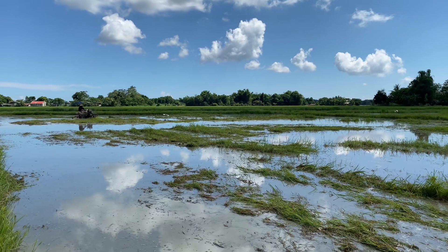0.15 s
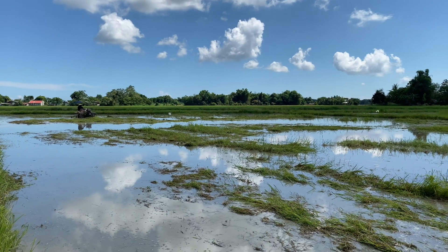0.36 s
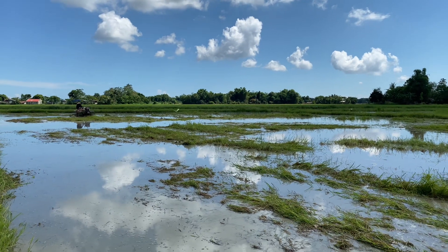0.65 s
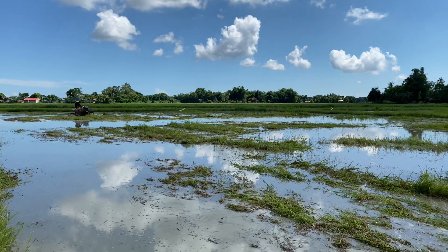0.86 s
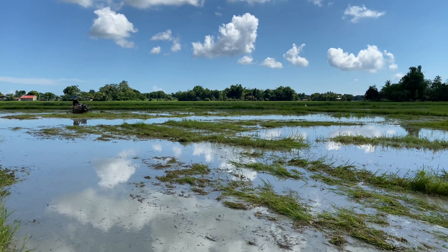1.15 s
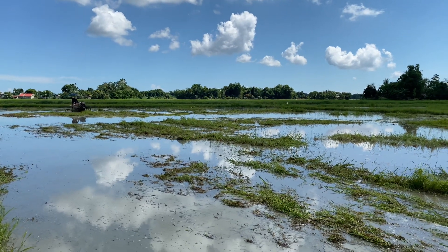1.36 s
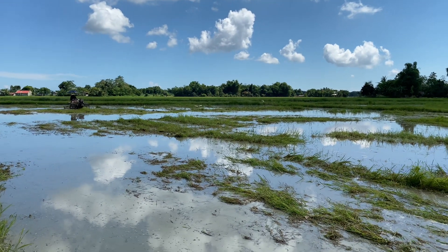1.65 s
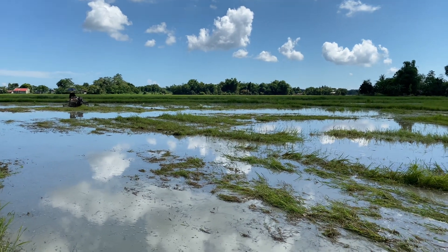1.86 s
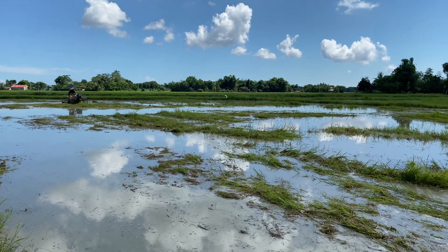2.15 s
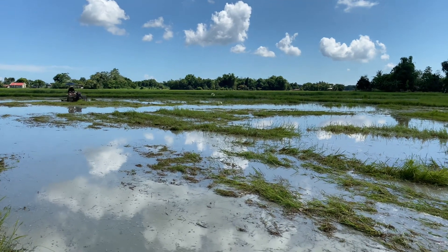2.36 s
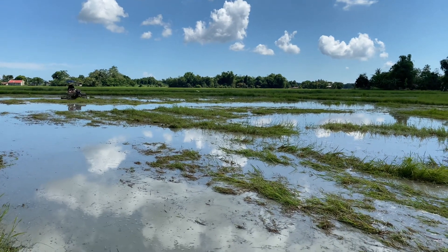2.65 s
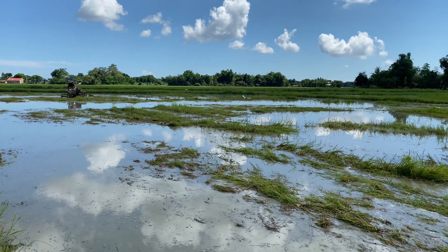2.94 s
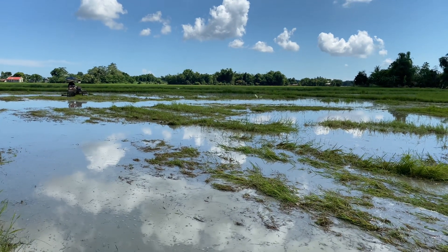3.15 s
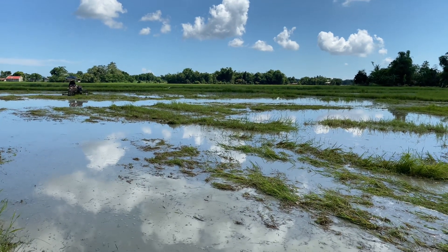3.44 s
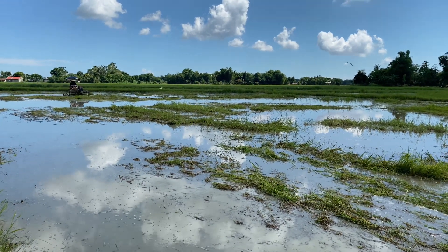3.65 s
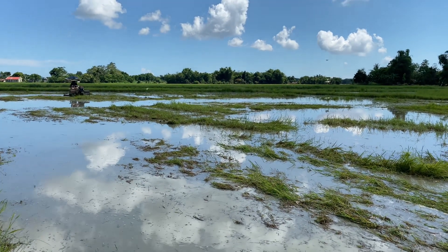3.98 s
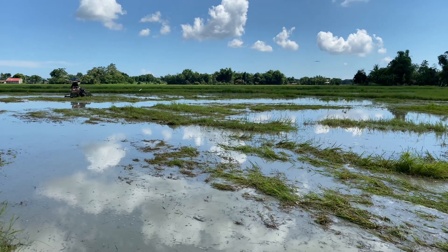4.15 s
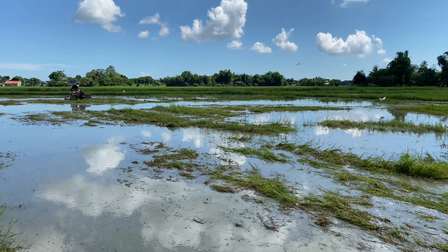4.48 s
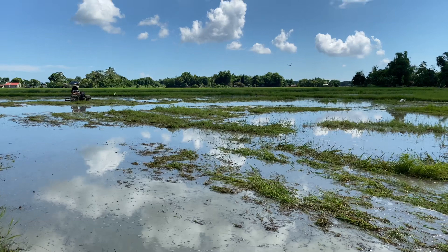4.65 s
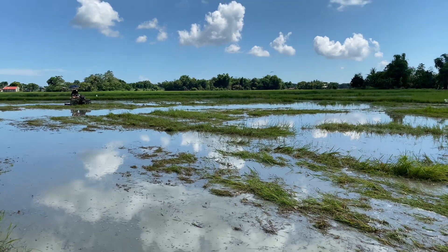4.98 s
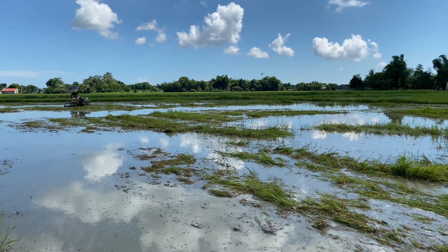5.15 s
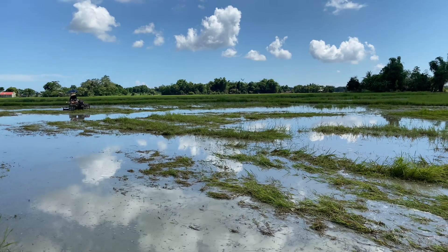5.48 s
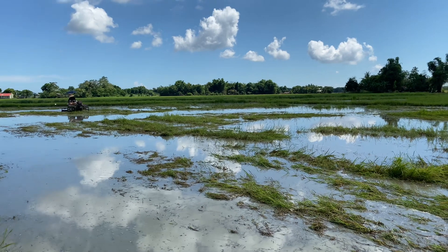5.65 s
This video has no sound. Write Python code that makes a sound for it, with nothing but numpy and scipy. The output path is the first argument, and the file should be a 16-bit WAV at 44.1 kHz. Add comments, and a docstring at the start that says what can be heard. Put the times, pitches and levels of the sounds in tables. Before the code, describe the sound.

A hand tractor's single-cylinder engine runs some way off in a flooded field, with fast, even exhaust thumps and light metallic clatter. It swells at the start, dips briefly past the middle and again near the end, then comes back. A thin high hiss of air and insects continues behind it. A few soft hollow knocks and light puffs of wind sound close to the stereo microphone.

```python
"""Hand tractor in a flooded field

A one-cylinder engine works some way off, firing about 16 times a second. Each firing thumps through
the muffler, barks from the tailpipe and knocks the engine block; in between, pipes ring, valves
clatter and the engine hums. The exhaust swells at the start and sinks briefly twice. Air and insects
hiss over the field, while a few soft knocks and puffs of air sound near the microphones."""
import sys
import numpy as np
from scipy import signal
from scipy.fft import rfft, irfft, next_fast_len
from scipy.io import wavfile
from scipy.ndimage import map_coordinates

SR = 44100
rng = np.random.default_rng(int(sys.argv[2]) if len(sys.argv) > 2 else 0)


def bounce(signal):
    """Save signal as a 16-bit WAV file at the path given by the first command-line argument."""
    frames = np.transpose(np.atleast_2d(signal))
    limited = np.clip(frames, -1, 1)
    pcm = np.round(limited * 32767).astype(np.int16)
    wavfile.write(sys.argv[1], SR, pcm)


N = 256662

# tone given by the ground's echo where the tractor starts and where it ends up: f/Hz, gain/dB
GROUND_START = [(300, 0), (500, -1), (680, 2), (800, 0.5), (1150, -2.5), (1350, 1), (1650, -2.5), (1950, 1),
                (2600, -0.5), (3800, -2), (5000, 0.5), (7000, 0)]
GROUND_END = [(350, 0), (540, -4.5), (680, -1), (800, -0.5), (1020, 4), (1250, 0), (1500, 0), (1900, 0.5),
              (2700, -1), (4200, 0), (5000, 0.5), (7000, -0.5)]
# how much of each tone is heard: t/s, start share/0-1, end share/0-1
GROUND_SHARES = [(0, 1, 0), (2.2, 0, 0), (4.6, 0, .1), (5.3, 0, 1)]
# sound thrown back by banks and trees: f/Hz, gain/dB
ECHO_TONE = [(60, -18), (150, -24), (300, -12), (550, -9), (850, -13), (1150, -11), (2000, -9), (3500, -7),
             (5000, -10), (6500, -17), (9000, -7), (15000, -6)]
# how far the left microphone is ahead of the right: f/Hz, phase/rad
LEFT_LEAD = [(250, -.28), (500, .5), (800, .8), (1300, 1.1), (1500, 1.7), (1720, 3.1), (2000, 6),
             (2400, 8.4), (2850, 7.9), (3500, 8.7), (4200, 11.9), (6000, 12.6), (7500, 12.6), (8300, 9.4),
             (10000, 6.3), (12000, 3.1), (13800, 0), (15800, -2)]
# how much louder the left one is: f/Hz, gain/dB
LEFT_GAIN = [(90, 0), (140, 1), (220, 1.5), (350, -1.3), (550, -2.7), (850, -2.7), (1130, 5), (1550, 0),
             (1900, 3.5), (2700, 5), (3400, 7), (4600, 3), (6000, 0), (15000, 0)]

# puffs of air on the microphones: t/s, level/dB, half length/s
AIR_PUFFS = [(0.872, -33, 0.043), (1.424, -30, 0.2), (1.904, -32, 0.19), (2.675, -30, 0.041),
             (3.05, -32, 0.13), (3.578, -31.5, 0.046), (4.5, -30.5, 0.046), (4.898, -44.5, 0.14),
             (5.284, -33, 0.025), (5.7, -31, 0.095)]
# their rumble: f/Hz, level/dB
AIR_TONE = [(15, -34), (35, -15), (48, -9), (62, 13), (85, 9.5), (140, -30), (300, -51)]
# hiss of field and machine: f/Hz, level/dB
HISS_TONE = [(1500, -30), (3500, -1), (4900, 10), (5700, 7.5), (6500, 10.5), (7600, 4), (9000, 3.5),
             (10900, 4.5), (12200, -7), (13500, -7), (15500, -13)]
# the field's upper part and the machine's lower part of that hiss: t/s, level/dB
FIELD_HISS_LEVEL = [(0, -49.5), (.95, -45.5), (1.35, -50), (2, -46), (3.2, -46.2), (3.65, -48.8),
                    (4, -45.5), (5, -44.5), (5.82, -47)]
MACHINE_HISS_LEVEL = [(0, -53.5), (1.5, -51), (3.2, -44.5), (3.75, -48.5), (5.82, -48.5)]
# soft knocks nearby: t/s, level/dB, f/Hz, time to fade by 60 dB/s, click level/dB
SOFT_KNOCKS = [(.16, -29.5, 559, 0.053, -63), (2.493, -17.5, 596, 0.023, -13.7),
               (2.857, -21.5, 535, 0.055, -29), (2.859, -23.5, 323, 0.089, -42),
               (2.866, -15, 140, 0.059, -63), (3.508, -26.5, 267, 0.085, -55), (4.087, -29, 576, 0.13, -48),
               (4.102, -27, 472, 0.12, -51), (4.578, -21.5, 640, 0.023, -42), (4.657, -17, 580, 0.029, -42),
               (4.683, -25.5, 718, 0.058, -48), (4.72, -30, 600, 0.047, -52)]
# the notes in their dry click: f/Hz, level/dB, time to fade by 60 dB/s
CLICK_NOTES = [(1650, -11, .008), (2850, -4.5, .0065), (6950, -3, 0.0042)]

# engine speed: t/s, firing rate/Hz
SPEED = [(0, 15.44), (.5, 15.472), (1, 15.635), (1.5, 15.805), (2, 15.923), (2.6, 16.019), (3.3, 16.112),
         (4, 16.112), (4.6, 16.019), (5.2, 16.042), (5.82, 16.042)]
# firings that stand out, nearly all harder than usual: t/s, gain/dB
HARD_FIRINGS = [(.227, 5.5), (.292, 3.5), (.357, 1), (.486, 1.5), (.742, 1.5), (.87, 1), (.934, 1),
                (.998, 1.5), (1.062, 1.5), (1.19, 2.5), (1.317, 1), (1.57, -1), (1.634, 1), (1.76, 1.5),
                (1.949, 2), (2.075, 2), (2.637, 3.5), (2.888, 1), (3.199, 3), (5.128, 1), (5.315, 5.5),
                (5.44, 3.5), (5.503, 1.5), (5.565, 2)]
# engine hum: multiple of the firing rate, relative level/dB
HUM_NOTES = [(28, -10), (31, -12.5), (51, -13)]
# ring of the valve's tap: f/Hz, width/Hz, level/dB
VALVE_RINGS = [(830, 130, -3.5), (1330, 280, 2), (2900, 700, -11)]
# loudness of that tap: t/s, level/dB
VALVE_LEVEL = [(0, -58.5), (1.5, -54), (3.5, -53), (4.8, -56), (5.82, -56)]
# ring of the engine's casing: f/Hz, width/Hz, level/dB
CASING_RINGS = [(1340, 280, -3), (2030, 210, -.5), (2710, 290, -1.5), (3750, 380, -4.5)]
# loudness of that ring: t/s, level/dB
CASING_LEVEL = [(0, -47), (.25, -48.5), (1.2, -51), (2, -54.5), (3.3, -57), (4.6, -58.5), (5.3, -53.5),
                (5.82, -53)]
# a firing's low clack and bright tick: f/Hz, level/dB
CLACK_TONE = [(400, -20), (800, 39.5), (1100, 20), (1400, -31), (1700, 36.5), (2000, 18), (2900, -53),
              (3700, -44), (6000, 2)]
TICK_TONE = [(1500, -22), (3000, -10), (3900, -7), (4800, 0), (5600, -.5), (6600, 0), (7800, -10),
             (10500, -17), (12500, -24), (15500, -27)]
# loudness of the tick: t/s, relative level/dB
TICK_LEVEL = [(0, -53.5), (.25, -47.5), (1.8, -48), (3.1, -45), (3.8, -49.5), (4.6, -49), (5.4, -47),
              (5.82, -46)]
# the treble dulls as the tractor moves on: t/s, gain above 6 kHz/dB
BRIGHTNESS = [(0, 3.5), (3.3, -1), (4.7, -5), (5.3, -15), (5.82, -8)]
# valve and piston rattles: place/cycles, width/cycles, relative level/dB
RATTLES = [(.02, 0.044, 4), (0.24, 0.056, -1.5), (0.22, 0.3, -3), (.74, .025, -2)]
# their clatter and metal rasp: f/Hz, level/dB
CLATTER_TONE = [(200, -19), (450, -5.5), (800, -1), (1050, -6.5), (1400, -1), (1650, -3), (2000, -4),
                (2450, -13.5), (3400, -7.5), (4500, -20.5), (7000, -17.5), (15000, -39)]
RASP_TONE = [(1200, 1.5), (1900, -2), (2300, -22), (2550, 7.5), (2850, 7), (3300, -8), (3800, 4),
             (5000, -40), (9000, -31)]
# the rasp fades and comes back; a thin cover buzzes louder near the end: t/s, level/dB
RASP_LEVEL = [(0, -42), (1.6, -49.5), (3.6, -52.5), (4.2, -48), (5.82, -46.5)]
BUZZ_LEVEL = [(0, -54.5), (4.7, -62), (5.1, -56), (5.35, -50), (5.6, -49), (5.82, -48)]

# pipes ringing between firings: place/cycles, f/Hz, width/Hz, level/dB, share of the puff's dip/0-1
PIPE_RINGS = [(.085, 705, 100, -49.5, .5), (.275, 365, 190, -47.5, .6), (.42, 485, 90, -51.5, .6),
              (.58, 820, 40, -48.5, .3), (.7, 910, 100, -55, .1)]
# crack of the opening exhaust valve: f/Hz, width/Hz, level/dB
CRACK_RINGS = [(290, 79, -7), (352, 58, -5.5), (446.6, 13, 1.5), (487, 20, -1), (614, 340, -1.5),
               (690, 55, -0.5), (814, 70, -0.5), (1380, 280, -18), (1940, 180, -15)]
# ring of the tailpipe and cover: f/Hz, width/Hz, level/dB
TAILPIPE_RINGS = [(297.5, 50, -1), (405, 190, -7), (554, 158, -5), (680, 61, -1.5), (790, 110, -3.5),
                  (934, 104, -7), (1257, 180, -11), (1490, 140, -11)]
# ring of the muffler: f/Hz, width/Hz, level/dB
MUFFLER_RINGS = [(90.7, 27.1, -9), (147, 25.5, -3.5), (150.07, 8.45, 0.5), (216.1, 41.4, -19)]
# rumble of the exhaust gas: f/Hz, level/dB
RUMBLE_TONE = [(15, -43), (35, -37), (45, -15), (58, -16), (80, 2.5), (100, -5.5), (150, -7), (240, -16),
               (330, -33), (600, -52.5)]
# moments when the exhaust sinks: start/s, end/s, thump loss/dB, puff loss/dB, bark loss/dB
DIPS = [(-.1, 0.13, 8, 5, 5), (3.24, 3.354, 9, 12.5, 1), (4.669, 4.925, 12, 12, 7.5)]

THUMP_DB, PUFF_DB, BARK_DB = -27.5, -35.2, -38.8  # the exhaust's three parts, outside the dips
FIRST_FIRING_S, FULL_SPEED_HZ = .0323, 16
TIME = np.arange(N) / SR


def amp(db):
    """Turn decibels into a number to multiply by."""
    return 10 ** (np.asarray(db) / 20)


def unit(x):
    """Scale a sound to an average strength (rms) of 1."""
    return x / np.sqrt(np.mean(x ** 2) + 1e-20)


def noise():
    """Fresh white noise for the whole scene."""
    return rng.standard_normal(N)


def along(points, hz):
    """Read between a table's points on a pitch-like (log) scale."""
    f, values = np.transpose(points)
    return np.interp(np.log(hz + 1), np.log(f + 1), values)


def curves(rows):
    """Draw a line through time for each column after the first."""
    times, *columns = np.transpose(rows)
    return [np.interp(TIME, times, column) for column in columns]


def wobble(rate):
    """A smooth random curve through `rate` points a second."""
    return map_coordinates(rng.standard_normal(int(N * rate / SR) + 4), [TIME * rate])


def filtered(x, response):
    """Change the strength and timing of each frequency by response(hz)."""
    size = next_fast_len(N + SR // 2)
    return irfft(rfft(x, size) * response(np.fft.rfftfreq(size, 1 / SR)), size)[..., :N]


def below(x, edge_hz, steepness=8):
    """Keep the part of a sound below edge_hz."""
    return filtered(x, lambda hz: 1 / (1 + (hz / edge_hz) ** steepness))


def coloured(x, tone):
    """Shape a sound with a tone table, at strength 1."""
    return unit(filtered(x, lambda hz: amp(along(tone, hz))))


def ringing(rings, hz):
    """The response of something that rings; narrower rings last longer."""
    return sum((-1) ** k * amp(db) * 1j * hz * width / (pitch ** 2 - hz ** 2 + 1j * hz * width)
               for k, (pitch, width, db) in enumerate(rings))


def delay(hz, seconds):
    """The response that makes a sound arrive later."""
    return np.exp(-2j * np.pi * hz * seconds)


def firings(cycle, spread_db):
    """One click of slightly random size at the start of each cycle."""
    starts = np.diff(np.floor(cycle), prepend=np.floor(cycle[0]))
    return starts * amp(spread_db * noise())


def burst(cycle, place, width, spread_db):
    """A smooth bump once a cycle, each of its own strength."""
    turn = cycle - place + .5
    sizes = amp(spread_db * rng.standard_normal(256))
    return sizes[np.floor(turn).astype(int) + 2] * np.exp(-.5 * ((turn % 1 - .5) / width) ** 2)


def strike(cycle, place, rise, fall, spread_db):
    """A fast rise and a slower fall once a cycle, both timed in cycles."""
    turn = cycle - place
    sizes = amp(spread_db * rng.standard_normal(256))
    age = turn % 1
    return sizes[np.floor(turn).astype(int) + 2] * np.exp(-age / fall) * (1 - np.exp(-age / rise))


def accent_db():
    """The change in level around each firing that stands out."""
    return sum(db * (np.abs(TIME - s) < .015) for s, db in HARD_FIRINGS)


def speed_gain(db_per_hz=5):
    """Gas rushes harder as the engine speeds up; 1 at FULL_SPEED_HZ."""
    return amp(db_per_hz * (curves(SPEED)[0] - FULL_SPEED_HZ))


def dips(lag_s, return_s, sink_s=.037):
    """Decibels lost by thump, puff and bark: each dip sinks fast, holds, then lets go slowly."""
    losses = 0
    for start, end, *depths in DIPS:
        sinking = np.clip((TIME - start) / sink_s, 0, 1)
        holding = np.clip(1 - (TIME - end - lag_s) / return_s, 0, 1)
        losses += np.outer(depths, sinking * holding)
    return losses


def exhaust_losses():
    """The dips in decibels, timed so the thump comes back first, then the puff, then the bark."""
    thump, _, _ = dips(lag_s=0, return_s=.26)
    _, puff, _ = dips(lag_s=.32, return_s=.14)
    _, _, bark = dips(lag_s=.42, return_s=.2)
    return thump, puff, bark


def dulled(x):
    """The engine's treble starts bright and dulls as the tractor moves on."""
    treble = x - below(x, 6000, steepness=12)
    return x + (amp(curves(BRIGHTNESS)[0]) - 1) * treble


def ground(x):
    """Sound bouncing off the wet field changes the engine's tone as it moves."""
    return x + sum(share * filtered(x, lambda hz: amp(along(tone, hz)) - 1)
                   for share, tone in zip(curves(GROUND_SHARES), (GROUND_START, GROUND_END)))


def echoes(x, fade_s=.075, count=4):
    """Banks and swaying trees send back a short, shifting wash, different on each side."""
    t = np.arange(SR // 6) / SR
    wash = np.zeros((2, N))
    for _ in range(count):
        tail = rng.standard_normal((2, len(t))) * amp(-60 * t / fade_s)
        tail /= np.linalg.norm(tail[0])
        wash += wobble(16) * signal.fftconvolve(x[None], tail, axes=1)[:, :N]
    return filtered(wash / np.sqrt(count), lambda hz: amp(along(ECHO_TONE, hz)))


def microphones(x):
    """Sound from one side reaches the two microphones with different timing and strength."""
    left = lambda hz: amp(along(LEFT_GAIN, hz) / 2) * np.exp(.5j * along(LEFT_LEAD, hz))
    return filtered(x, lambda hz: np.array([left(hz), 1 / left(hz)]))


def air_puffs():
    """Light puffs of air rumble on the microphones."""
    push = sum(amp(db) * np.exp(-.5 * ((TIME - s) / length) ** 2) for s, db, length in AIR_PUFFS)
    return push * coloured(noise(), AIR_TONE)


def hiss(cycle, split_hz=8000):
    """Field and machine make a high hiss that flutters a little with the engine."""
    flutter = 1 + .55 * burst(cycle, place=.27, width=.11, spread_db=4)
    flutter += .55 * burst(cycle, place=-.13, width=.08, spread_db=3.5)
    air = coloured(flutter * noise(), HISS_TONE) * amp(1.2 * wobble(90))
    lower = below(air, split_hz)
    machine = amp(curves(MACHINE_HISS_LEVEL)[0]) * dulled(lower)
    field = amp(curves(FIELD_HISS_LEVEL)[0]) * (air - lower)
    return machine + field


def soft_knocks():
    """Short hollow knocks ring with two low notes, some with a dry click on top."""
    out, t = np.zeros(N + SR), np.arange(SR // 4) / SR
    for s, db, hz, fade_s, click_db in SOFT_KNOCKS:
        ring = np.sin(2 * np.pi * hz * t) + .37 * np.sin(2 * np.pi * .8 * hz * t)
        body = amp(db - 60 * t / fade_s) * ring * (1 - np.exp(-t / .00088))
        snap = sum(amp(level - 60 * t / life) * np.sin(2 * np.pi * f * t)
                   for f, level, life in CLICK_NOTES)
        grit = .28 * amp(-60 * t / .004) * rng.standard_normal(len(t))
        out[round(s * SR):][:len(t)] += body + amp(click_db) * (snap + grit)
    return out[:N]


def hum(cycle, boost_db=.6):
    """Steady notes hum at multiples of the firing rate, wavering and sinking with the bark."""
    _, _, bark_loss = exhaust_losses()
    notes = sum(amp(db + 1.5 * wobble(4)) * np.sin(2 * np.pi * multiple * cycle + .25 * wobble(6))
                for multiple, db in HUM_NOTES)
    return amp(BARK_DB + boost_db - bark_loss) * notes


def valve(cycle):
    """A valve shuts with a metallic tap a quarter cycle before each firing."""
    tap = strike(cycle, place=.755, rise=.008, fall=.04, spread_db=2) * noise()
    ring = unit(filtered(tap, lambda hz: ringing(VALVE_RINGS, hz)))
    return amp(curves(VALVE_LEVEL)[0]) * ring


def casing(cycle, lead_s=.000809, grit=.17):
    """Each firing strikes the casing sharply and leaves a short, gritty rattle."""
    rattle = strike(cycle, place=0, rise=.006, fall=.035, spread_db=1) * noise()
    blow = (firings(cycle, spread_db=1.5) + grit * rattle) * amp(accent_db())
    ring = unit(filtered(blow, lambda hz: ringing(CASING_RINGS, hz) * delay(hz, -lead_s)))
    return amp(curves(CASING_LEVEL)[0]) * ring


def engine_block(cycle, clack_db=-52, clatter_db=-47):
    """Each firing knocks the block; valves, piston and thin covers rattle through the cycle."""
    # a short jump in pressure, then the block's ring dies away
    spike = strike(cycle, place=-.022, rise=.015, fall=.026, spread_db=1)
    tail = .08 * strike(cycle, place=-.02, rise=.008, fall=.12, spread_db=1)
    blow = (spike + tail) * amp(accent_db())
    tick = amp(curves(TICK_LEVEL)[0] - 3) * dulled(coloured(blow * noise(), TICK_TONE))
    clack = amp(clack_db) * coloured(blow * noise(), CLACK_TONE)
    rattle = 1 + sum(amp(db - 6.5) * burst(cycle, place, width, spread_db=-.5)
                     for place, width, db in RATTLES)
    clatter = amp(clatter_db) * coloured(rattle * noise(), CLATTER_TONE)
    rasp = amp(curves(RASP_LEVEL)[0]) * coloured((rattle + .77 * blow) * noise(), RASP_TONE)
    cover = unit(filtered(rattle * noise(), lambda hz: ringing([(2384, 510, 0)], hz) ** 2))
    buzz = amp(curves(BUZZ_LEVEL)[0]) * cover
    return tick + clack + clatter + rasp + buzz


def pipes(cycle, air_share=.5):
    """Piston and intake tug on the pipes at set places in each cycle and make them ring."""
    _, puff_loss, _ = exhaust_losses()
    rings = np.zeros(N)
    for place, pitch, width, db, dip_share in PIPE_RINGS:
        air = burst(cycle, place=place + .05, width=.08, spread_db=1) * noise()
        tug = unit(firings(cycle - place, spread_db=1.5)) + air_share * unit(air)
        ring = unit(filtered(tug, lambda hz: ringing([(pitch, width, 0)], hz) ** 2))
        rings += amp(db - dip_share * puff_loss) * ring
    return rings * speed_gain(db_per_hz=4.5)


def exhaust_crack(cycle, soft_hz=1300, lead_s=.0021, repeat_s=.0202):
    """The exhaust valve cracks open just ahead of each firing; a softer repeat follows."""
    soften = lambda hz: 1 / (1 + 1j * hz / soft_hz)
    # all the rings start together, softened because the valve takes a moment to open
    ring = lambda hz: -sum(ringing([row], hz) for row in CRACK_RINGS) * soften(hz) ** 2
    path = lambda hz: delay(hz, -lead_s) * (1 + .4 * delay(hz, repeat_s) * soften(hz))
    openings = firings(cycle, spread_db=1.2) * amp(.5 * accent_db())
    return unit(filtered(openings, lambda hz: ring(hz) * path(hz)))


def tailpipe_bark(cycle, split_hz=640):
    """The valve cracks into the tailpipe; a blast of gas, then the piston's push, keep it ringing."""
    _, _, bark_loss = exhaust_losses()
    crack = exhaust_crack(cycle)
    blast = .64 * burst(cycle, place=-.03, width=.03, spread_db=1.2)
    push = .48 * burst(cycle, place=.22, width=.14, spread_db=1.5)
    # in a dip the push fades most, leaving a drier bark
    flow = 1 + blast + push * speed_gain() * amp(-2 * bark_loss)
    gas = flow * np.sqrt(speed_gain()) * noise()
    rush = unit(filtered(gas, lambda hz: ringing(TAILPIPE_RINGS, hz)))
    bark = unit(.95 * crack + rush)
    # the deep part sinks further and stays low for longer
    deep = below(bark, split_hz)
    _, _, deep_loss = dips(lag_s=.42, return_s=.67)
    return amp(BARK_DB - bark_loss) * (bark - deep + deep * amp(-.55 * deep_loss))


def muffler(cycle, mouth_hz=67, split_hz=180, rumble_db=-8, muffle_hz=370):
    """Gas pulses thump and puff through the muffler; uneven burning and moving air add a rumble."""
    # the small pipe mouth lets out little bass
    mouth = lambda hz: (hz * hz / (hz * hz - 1j * hz * mouth_hz - mouth_hz ** 2)) ** 2
    # a weaker pulse follows a quarter cycle later
    path = lambda hz: delay(hz, .0014) * (1 + .3 * delay(hz, .0161)) / (1 + (hz / muffle_hz) ** 6)
    kicks = firings(cycle, spread_db=.6)
    pulses = unit(filtered(kicks, lambda hz: ringing(MUFFLER_RINGS, hz) * mouth(hz) * path(hz)))
    swell = amp(1.4 * wobble(5)) * speed_gain()
    gas = pulses + amp(rumble_db) * coloured(swell * noise(), RUMBLE_TONE)
    thump = below(gas, split_hz)
    puff = gas - thump
    thump_loss, puff_loss, _ = exhaust_losses()
    return amp(THUMP_DB - thump_loss) * unit(thump) + amp(PUFF_DB - puff_loss) * unit(puff)


def scene():
    """Mix tractor and field; every engine sound follows one count that rises by 1 per firing."""
    cycle = np.cumsum(curves(SPEED)[0]) / SR
    cycle -= cycle[round(FIRST_FIRING_S * SR)]
    engine = muffler(cycle) + tailpipe_bark(cycle) + pipes(cycle)
    engine += hum(cycle) + engine_block(cycle) + casing(cycle) + valve(cycle)
    direct = ground(engine) + hiss(cycle) + soft_knocks()
    return microphones(direct + air_puffs()) + echoes(direct)


def record(dry, top_hz=15600):
    """Cut away the very highest treble."""
    return filtered(dry, lambda hz: hz < top_hz)


dry = scene()
out = record(dry)
bounce(out)
```